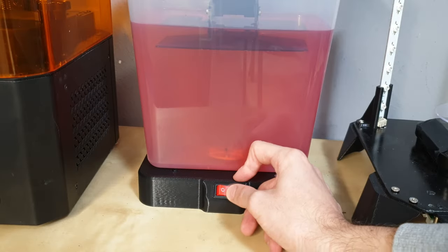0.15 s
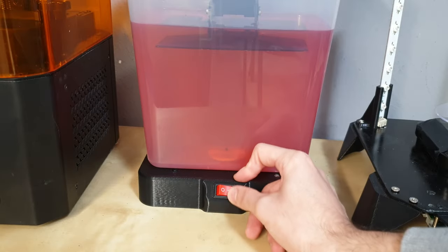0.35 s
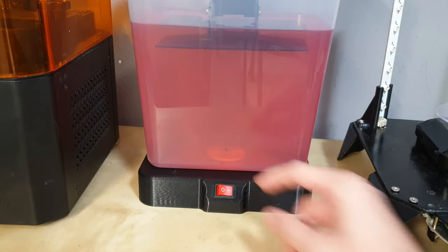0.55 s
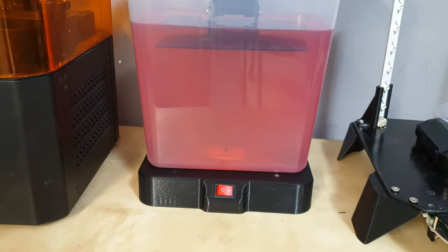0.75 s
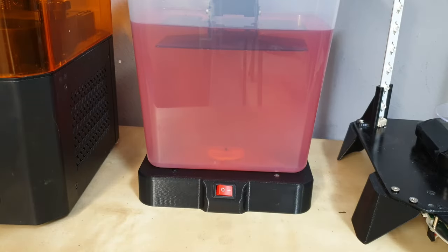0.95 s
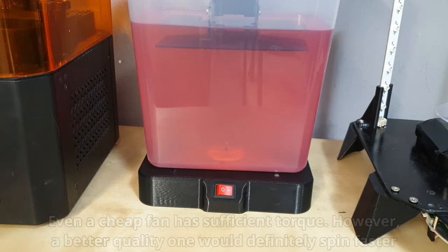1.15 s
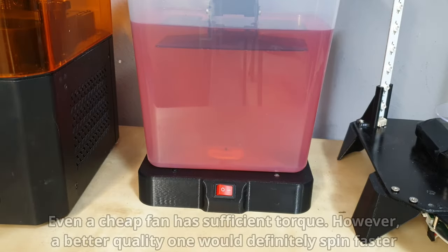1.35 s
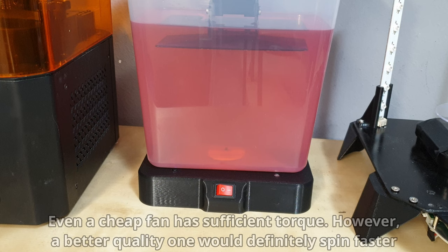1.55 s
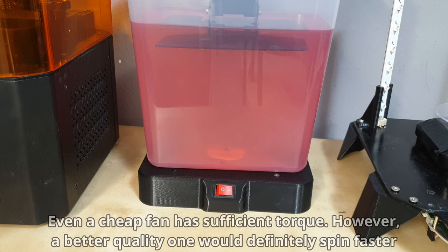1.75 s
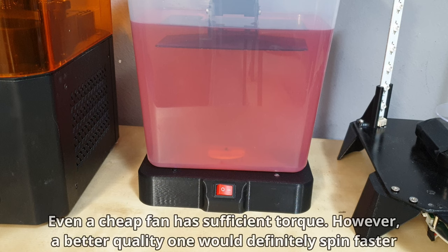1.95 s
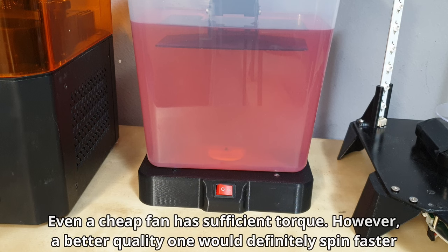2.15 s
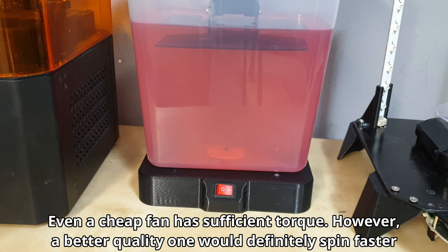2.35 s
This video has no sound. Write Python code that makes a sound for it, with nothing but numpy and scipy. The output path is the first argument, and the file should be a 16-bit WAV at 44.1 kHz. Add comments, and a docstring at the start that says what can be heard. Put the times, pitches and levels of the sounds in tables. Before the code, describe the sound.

A stirrer bar rumbles and rubs rhythmically in a plastic tank after a switch clicks.

```python
"""A fan-driven magnetic stirrer starts under a plastic tank of liquid in a small workshop.
Its bar turns about seven times a second, two rubs a turn; slips and bumps on the floor ring the tank.
Just before, a finger brushes a rocker switch and snaps it on: two contacts crack, the housing rings,
the tank thuds and the room echoes. Underneath: steady room noise, faint fan rumble, a fading hiss."""
import sys
import numpy as np
from scipy import signal
from scipy.fft import rfft, irfft
from scipy.io import wavfile
from scipy.ndimage import map_coordinates

SR = 44100
rng = np.random.default_rng(int(sys.argv[2]) if len(sys.argv) > 2 else 0)


def unload_audio(sound):
    """Save the sound as a 16-bit wav file, at the path given as the first command line argument."""
    columns = np.transpose(np.atleast_2d(sound))
    # keep every value between -1 and 1, then stretch to whole-number steps
    steps = np.round(np.clip(columns, -1, 1) * 32767)
    wavfile.write(sys.argv[1], SR, steps.astype(np.int16))


N = 105840

# room noise spectrum: freq_hz, density_db
ROOM_SPECTRUM = [(25, 5.5), (50, 13), (100, 11), (190, 10), (290, 14.5), (450, 5.5), (900, 3), (2000, 3),
                 (3000, -4), (5000, -5.5), (6800, -5), (8300, -11), (11000, -3), (15000, -1.5)]
# room left-right likeness: freq_hz, correlation
ROOM_CORRELATION = [(50, 0.5804), (300, 0.55), (1400, 0.078), (3000, 0.0083)]
# room decay: freq_hz, t60_s
ROOM_DECAY = [(100, 0.54), (300, 0.25), (700, .36), (1400, 0.48), (3200, 0.51), (6500, .47), (9000, .38),
              (15000, .33)]
# fan rumble spectrum: freq_hz, density_db
RUMBLE_SPECTRUM = [(20, -10.5), (42, -1), (70, -10.5), (150, -18), (600, -67)]
# treble hiss spectrum: freq_hz, density_db
HISS_SPECTRUM = [(2000, -31), (5400, -12.5), (6600, -2.5), (7400, -10), (8400, -18.5), (10500, -10.5),
                 (15500, -8)]
# treble hiss envelope: time_s, level_db
HISS_ENVELOPE = [(.22, -100), (0.451, -64.5), (0.721, -72), (.9, -77.5), (1.03, -75.5), (1.2, -80.5),
                 (1.45, -88), (2.4, -90)]
# finger friction spectrum: freq_hz, density_db
BRUSH_SPECTRUM = [(500, -20), (1200, -5.5), (1900, 0), (2400, -4), (2900, 1.5), (4000, -7), (6500, -8),
                  (9000, -20)]
# finger friction envelope: time_s, level_db
BRUSH_ENVELOPE = [(0, -80.5), (.08, -79.5), (.12, -85), (.17, -87), (.21, -100)]
# two switch contacts, then a quick reflection from the left: start_s, level_db, left_over_right_db
SNAP_ARRIVALS = [(0.2146, -10.5, -9), (.2161, -8, -0.5), (0.218, -18.5, 4)]
# switch body response: freq_hz, gain_db
SNAP_RESPONSE = [(60, -29.5), (250, -22.5), (650, -28.5), (850, -14), (1020, -13.5), (1270, -4),
                 (1700, -11.5), (2200, -11), (3300, 2.5), (4400, -4.5), (6200, 4), (7600, -1), (8200, -11),
                 (9500, -1), (13000, 1), (15800, 0.5)]
# snap left-right likeness: freq_hz, correlation
SNAP_CORRELATION = [(200, .85), (1000, .5), (3000, .1), (6000, -0.49), (11000, .2)]
# snap balance: freq_hz, left_over_right_db
SNAP_PAN = [(200, -0.5), (1300, 2), (6000, -2), (9000, -1.5), (14000, 3)]
# switch housing modes: pitch_hz, level_db, t60_s
HOUSING_MODES = [(1224, -13.5, 0.065), (1450, -17.5, .04), (3042, -20.5, .3), (3160, -18, 0.22),
                 (5610, -8, 0.095), (5790, -5.5, 0.076), (6060, -17, .3), (6590, -8, .04), (7580, -10, .05),
                 (12520, -7.5, .05), (13710, -8, 0.042)]
# tank modes struck by the snap: pitch_hz, level_db, t60_s
THUD_MODES = [(45, -18.5, .1), (137, -8.5, .17), (204, -2.5, .22), (257.6, -5.5, 0.36), (370.2, -6, 0.13)]
# snap reverb spectrum: freq_hz, density_db
ECHO_SPECTRUM = [(60, -30.5), (160, -14.5), (280, -7), (480, -9.5), (680, -17), (1000, -10.5), (1400, -4.5),
                 (2300, -10), (2800, -2.5), (3200, 3.5), (3800, -4.5), (4700, -4), (5900, 3), (7400, -3),
                 (8500, -5.5), (12000, 1), (16000, -2.5)]
# snap reverb and hiss balance: freq_hz, left_over_right_db
ECHO_PAN = [(200, -1.5), (1300, -2.5), (4400, -5.5), (8000, -5.5), (11000, -0.5), (15000, 1.5)]
# tank broad response: freq_hz, gain_db
TANK_RESPONSE = [(60, -24), (150, -10), (230, -9), (310, 0.5), (480, 2), (620, -4.5), (760, -2), (900, -5),
                 (1170, -4.5), (1450, -15), (1950, -24.5), (2900, -36), (6000, -46), (15000, -57.5)]
# tank resonances: pitch_hz, width_hz, gain_db
TANK_RESONANCES = [(335, 140, -6.5), (462.1, 24, -7.5), (715, 36, -8.5), (1000, 280, -9.5)]
# tank balance: freq_hz, left_over_right_db
TANK_PAN = [(60, 0), (200, -4.5), (380, -7.5), (700, -2.5), (1290, -1), (2400, 0)]
# tank reverb send: freq_hz, gain_db
TANK_SEND = [(200, -7.5), (400, -5), (700, -2), (1400, -3), (3000, 1)]
# stir bar turns: main_rub_peak_s, main_rub_db, lead_rub_db
BAR_TURNS = [(.468, -8.5, -8), (0.624, -5, -9.5), (0.778, -1.5, -5), (0.924, 0, -8), (1.081, -6, -3.5),
             (1.22, -2.5, 0), (1.364, -3.5, -2.5), (1.515, -2.6, -4), (1.650, -2.5, -5), (1.797, -2.9, -5),
             (1.945, -3, -5.8), (2.084, -2.2, -5.5), (2.23, -3.5, -5.4), (2.378, -4, -8.5)]
# bar bumps on the tank floor: start_s, level_db
BAR_BUMPS = [(0.569, -53), (0.699, -53.5), (0.92, -46.5), (1.011, -54), (1.298, -53), (1.445, -52.5),
             (1.575, -56), (1.642, -47), (1.934, -50.5), (2.077, -50), (2.167, -59), (2.22, -53),
             (2.366, -45.5)]

SWITCH_ON_S, SPIN_UP_S = SNAP_ARRIVALS[0][0], 0.68
SNAP_ATTACK_S, ECHO_ATTACK_S = 0.00018, 0.002


def amp(db):
    """Decibels to gain."""
    return 10 ** (np.asarray(db) / 20)


def unit(x):
    """Scale to rms 1."""
    return x / np.sqrt(np.mean(x ** 2) + 1e-20)


def along(points, hz):
    """Interpolate (freq_hz, value) points on a log axis."""
    freqs_hz, values = np.transpose(points)
    return np.interp(np.log(hz + 1), np.log(freqs_hz + 1), values)


def filtered(x, response):
    """Apply a complex frequency response."""
    return irfft(rfft(x, 2 * N) * response(np.fft.rfftfreq(2 * N, 1 / SR)))[..., :N]


def min_phase(gain):
    """Minimum-phase response with this gain."""
    cepstrum = irfft(np.log(np.maximum(gain, 1e-6)))
    cepstrum[1:N] *= 2
    cepstrum[N + 1:] = 0
    return np.exp(rfft(cepstrum))


def pan(db):
    """Left and right gains for a level difference."""
    return amp(np.array([[.5], [-.5]]) * db)


def noise(spectrum, correlation=((100, 0),), balance=((100, 0),)):
    """Coloured stereo noise, rms 1."""
    def mid_side_gains(hz):
        angle = np.arccos(np.clip(along(correlation, hz), -1, 1)) / 2
        return amp(along(spectrum, hz)) * [np.cos(angle), np.sin(angle)]
    mid, side = filtered(rng.standard_normal((2, N)), mid_side_gains)
    stereo = np.array([mid + side, mid - side])
    return unit(filtered(stereo, lambda hz: pan(along(balance, hz))))


def since(start_s):
    """Seconds since start_s, zero before."""
    return np.maximum(np.arange(N) / SR - start_s, 0)


def envelope(points):
    """Gain through (time_s, level_db) points."""
    return amp(np.interp(since(0), *np.transpose(points)))


def strike(start_s, attack_s, t60_s):
    """Quick rise, exponential fall."""
    t = since(start_s)
    return (1 - np.exp(-t / attack_s)) * amp(-60 * t / t60_s)


def ring(modes, start_s, attack_s, channels):
    """Damped modes, random phase per channel."""
    out = 0
    for hz, db, t60_s in modes:
        cycles = hz * since(start_s) + rng.random((channels, 1))
        out = out + amp(db) * strike(start_s, attack_s, t60_s) * np.sin(2 * np.pi * cycles)
    return out


def room_decay(x, start_s):
    """Fade in at start_s; each band then dies at the room's rate."""
    hz, t, bands = signal.stft(x, SR, nperseg=256)
    fade = amp(-60 * np.maximum(t - start_s, 0) / along(ROOM_DECAY, hz)[:, None])
    rise = 1 - np.exp(-since(start_s) / ECHO_ATTACK_S)
    return signal.istft(bands * fade, SR, nperseg=256)[1][:, :N] * rise


def reflect(x, impulse):
    """Convolve mono x with a normalised stereo impulse response."""
    return signal.fftconvolve(x[None], impulse / np.linalg.norm(impulse[0]), axes=1)[:, :N]


def fan_speed():
    """Fraction of full speed: linear ramp from switch-on."""
    return np.minimum(since(SWITCH_ON_S) / SPIN_UP_S, 1)


def background():
    """Steady room noise, fan rumble rising with speed, a treble hiss that swells and fades."""
    room = amp(-75.5) * noise(ROOM_SPECTRUM, ROOM_CORRELATION)
    rumble = amp(-82) * noise(RUMBLE_SPECTRUM, ROOM_CORRELATION, TANK_PAN) * fan_speed() ** 3
    hiss = envelope(HISS_ENVELOPE) * noise(HISS_SPECTRUM, balance=ECHO_PAN)
    return room + rumble + hiss


def finger():
    """Skin slides faintly over the rocker."""
    return envelope(BRUSH_ENVELOPE) * noise(BRUSH_SPECTRUM)


def crack(start_s, attack_s, t60_s, balance):
    """White noise burst shaped by the switch body."""
    burst = noise([(100, 0)], SNAP_CORRELATION, balance) * strike(start_s, attack_s, t60_s)
    return filtered(burst, lambda hz: min_phase(unit(amp(along(SNAP_RESPONSE, hz)))))


def rocker_switch():
    """Two contacts crack and ring the housing; a left reflection, tank thud and room echo follow."""
    thud = amp(-47) * ring(THUD_MODES, SWITCH_ON_S, attack_s=0.013, channels=1) * pan(db=-1.5)
    snap = 0
    for start_s, level_db, side_db in SNAP_ARRIVALS:
        housing = amp(-14) * ring(HOUSING_MODES, start_s, SNAP_ATTACK_S, channels=2)
        burst = crack(start_s, SNAP_ATTACK_S, t60_s=0.013, balance=SNAP_PAN)
        snap = snap + amp(level_db) * pan(side_db) * (burst + housing)
    early = amp(-11) * crack(SWITCH_ON_S, ECHO_ATTACK_S, t60_s=0.069, balance=ECHO_PAN)
    tail = amp(-24) * room_decay(noise(ECHO_SPECTRUM, ROOM_CORRELATION, ECHO_PAN), SWITCH_ON_S)
    return thud + snap + early + tail


def tank_body(hz):
    """Plastic tank response: resonances on a broad curve, rms gain 1."""
    peaks = sum(amp(db) * 1j * hz * width_hz / (pitch_hz ** 2 - hz ** 2 + 1j * hz * width_hz)
                for pitch_hz, width_hz, db in TANK_RESONANCES)
    response = min_phase(amp(along(TANK_RESPONSE, hz))) * (1 + peaks)
    return response / np.sqrt(np.mean(np.abs(response) ** 2))


def tank(force):
    """Force on the tank floor, radiated by the body, with wall reflections and room tail."""
    direct = filtered(force, tank_body)
    tail_ir = room_decay(rng.standard_normal((2, N)), start_s=0)
    walls_ir = rng.standard_normal((2, N)) * strike(0, ECHO_ATTACK_S, t60_s=0.034)
    reflections = amp(-5.5) * reflect(direct, tail_ir) + amp(-0.5) * reflect(direct, walls_ir)
    room = filtered(reflections, lambda hz: amp(along(TANK_SEND, hz)))
    return filtered(direct + room, lambda hz: pan(along(TANK_PAN, hz)))


def rub(peak_s, sigma_s):
    """Gaussian swell of contact pressure."""
    return np.exp(-.5 * ((since(0) - peak_s) / sigma_s) ** 2)


def stir_bar(lead_s=0.05095, slips_per_s=600, slip_spread_db=2.5, bump_lag_s=0.001955):
    """The bar drags lightly, rubs harder twice a turn in tiny slips, and bumps the tank floor."""
    pressure = amp(-13.5) * fan_speed()  # drag between rubs
    for peak_s, main_db, lead_db in BAR_TURNS:
        pressure += amp(main_db) * rub(peak_s, sigma_s=0.016)
        pressure += amp(lead_db) * rub(peak_s - lead_s, sigma_s=0.018)
    slipping = rng.random(N) < slips_per_s / SR
    slip_size = amp(slip_spread_db * rng.uniform(-1, 1, N))
    smooth_friction = rng.standard_normal(N)
    slips = unit(slipping * slip_size * np.sign(smooth_friction))
    force = amp(-62.5) * pressure * (slips + amp(-6.5) * smooth_friction)
    for start_s, level_db in BAR_BUMPS:
        force[round((start_s + bump_lag_s) * SR)] += amp(11.5 + level_db)
    return tank(force)


def scene():
    """Finger, switch, stirrer and background, in stereo."""
    return finger() + rocker_switch() + stir_bar() + background()


def record(dry):
    """Steep minimum-phase low-pass."""
    cutoff_hz, order = 15900, 80
    return filtered(dry, lambda hz: min_phase(1 / np.sqrt(1 + (hz / cutoff_hz) ** (2 * order))))


dry = scene()
out = record(dry)
unload_audio(out)
```